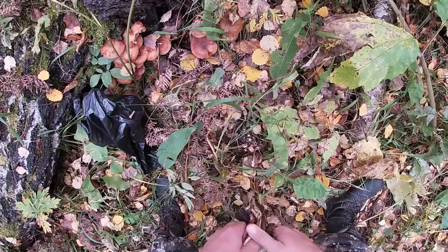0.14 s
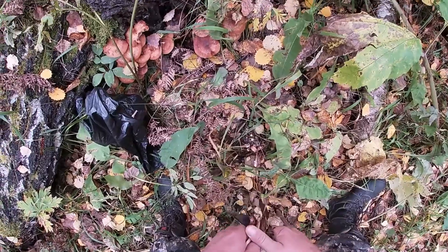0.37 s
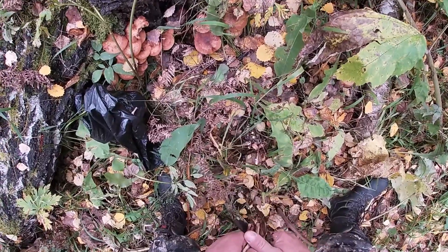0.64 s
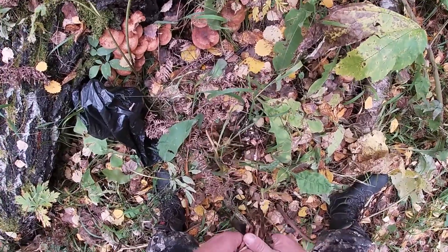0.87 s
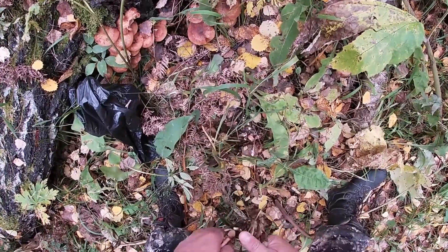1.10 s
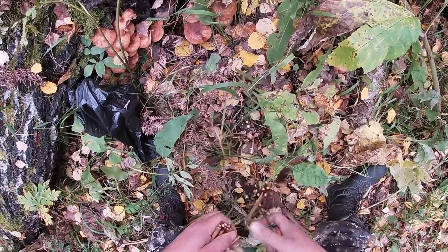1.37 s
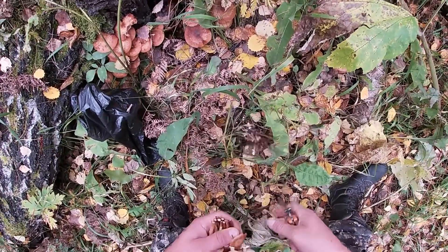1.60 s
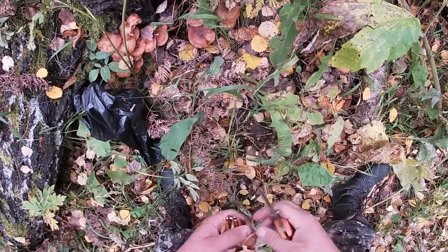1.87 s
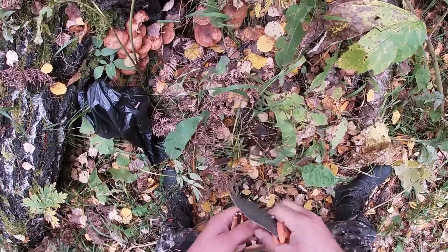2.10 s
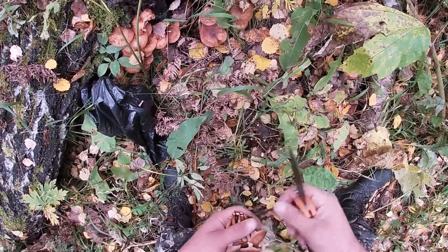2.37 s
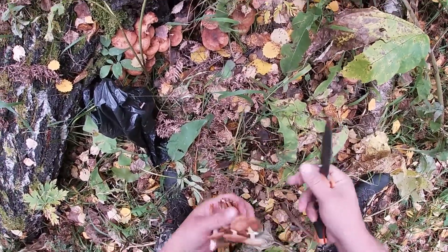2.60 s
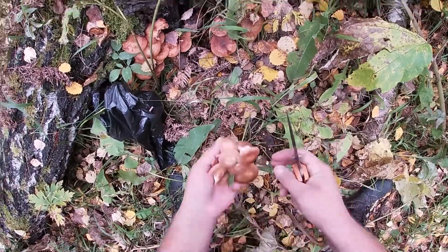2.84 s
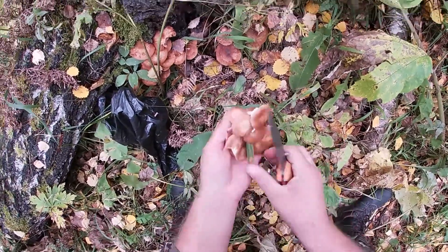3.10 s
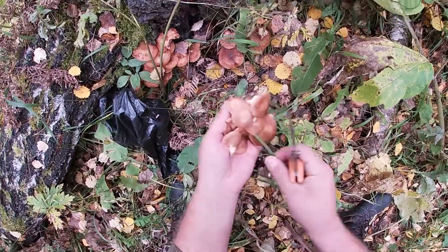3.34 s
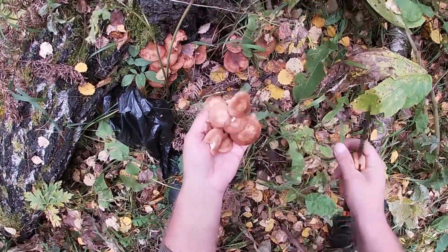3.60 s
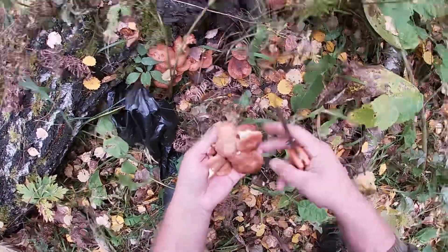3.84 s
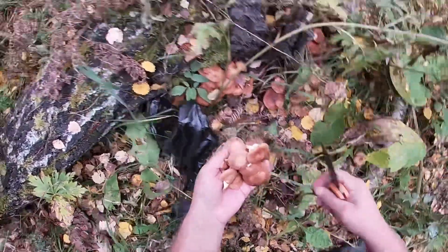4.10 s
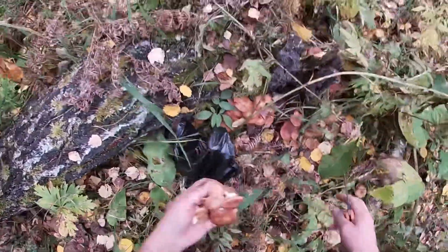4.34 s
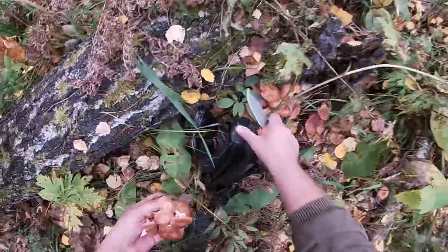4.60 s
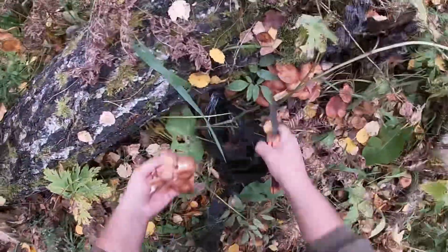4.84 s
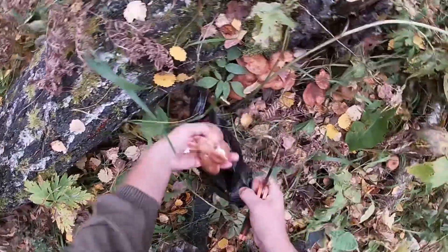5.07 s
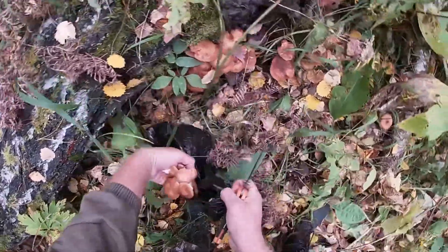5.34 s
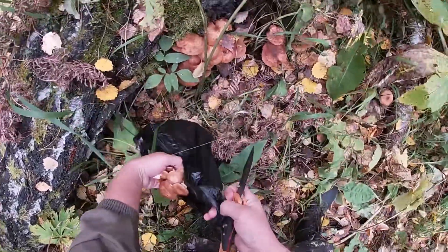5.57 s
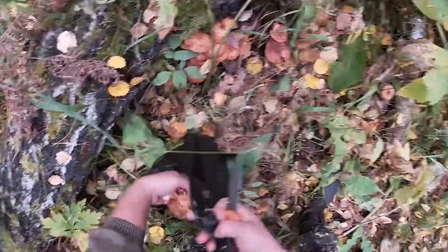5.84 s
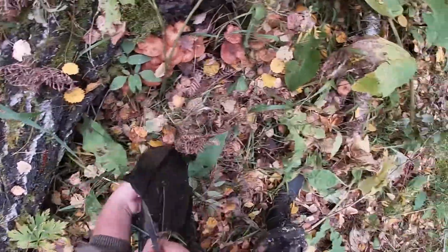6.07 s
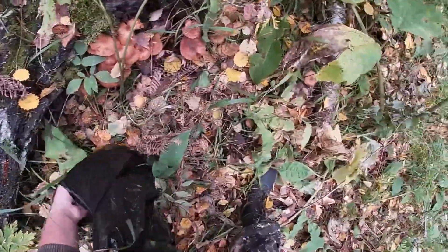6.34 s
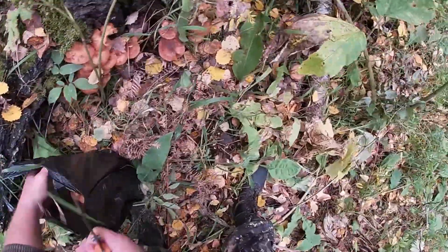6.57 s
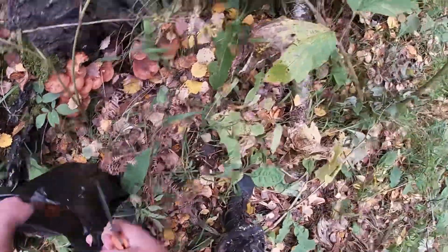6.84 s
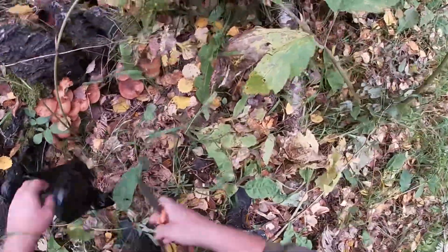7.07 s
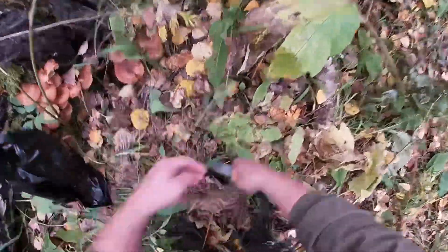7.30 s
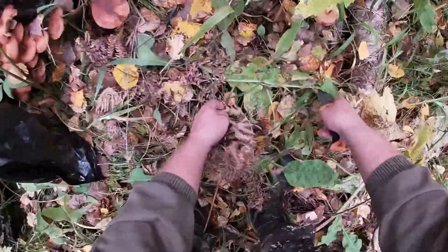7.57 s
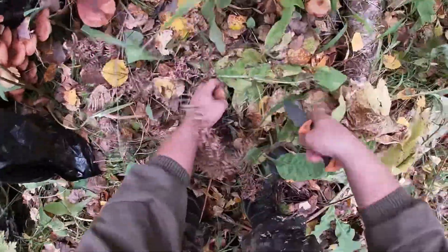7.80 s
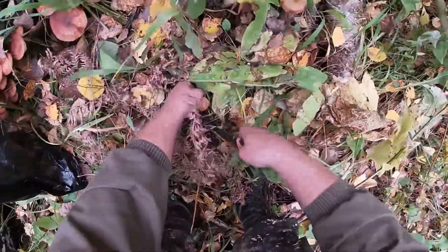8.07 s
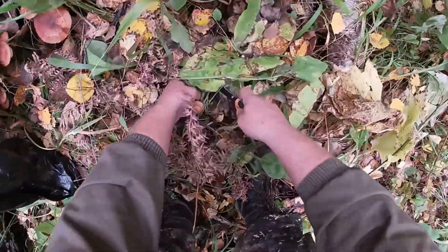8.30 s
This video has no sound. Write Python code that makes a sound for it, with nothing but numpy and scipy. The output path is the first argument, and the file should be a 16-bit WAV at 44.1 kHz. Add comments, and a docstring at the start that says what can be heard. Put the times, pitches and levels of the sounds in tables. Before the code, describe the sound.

Dry leaves fizz and rub in short strokes, then stems and a plastic bag crumple, sharp twig cracks peaking before it thins out.

```python
"""Forest floor, hands and a knife at work in dry leaves, heard close by the microphone of a body-worn camera.
First leaves fizz in single strokes as sleeves rub and a few twigs crack; from 3 s snaps and knocks come closer.
At 4.8 s a stem squeaks on the blade, then stems and a thin plastic bag crumple about as loud as the leaves.
The hardest snaps fall from 6.5 to 7.8 s among thumps; then it thins out, with last cracks at 8.4 s.
Shaped noise makes hiss, rustle and camera shake; damped sines and rung noise bursts make knocks and snaps."""
import sys
import numpy as np
from scipy import signal
from scipy.fft import rfft, irfft, next_fast_len
from scipy.io import wavfile
from scipy.ndimage import uniform_filter1d

SR = 44100
rng = np.random.default_rng(int(sys.argv[2]) if len(sys.argv) > 2 else 0)


def level_to_linear(level):
    """Convert decibel levels to linear amplitude factors, elementwise."""
    exponent = np.asarray(level, float) / 20
    return 10 ** exponent


def transcribe(signal):
    """Save signal, clipped to [-1, 1], as a 16-bit WAV file at the path in sys.argv[1]."""
    frames = np.atleast_2d(signal).T
    limited = np.clip(frames, -1, 1)
    pcm = np.round(limited * 32767).astype(np.int16)
    wavfile.write(sys.argv[1], SR, pcm)


N = 371983


def unit(x):
    """Scales x to rms 1."""
    return x / np.sqrt(np.mean(x ** 2) + 1e-20)


def curves(rows):
    """Interpolates each column after the time to one value per sample."""
    s, *cols = np.transpose(rows)
    return [np.interp(np.arange(N) / SR, s, c) for c in cols]


def coloured(x, points):
    """Passes x through the causal minimum-phase filter whose gain follows the (f/Hz, level/dB) points."""
    size = 2 * next_fast_len(len(x) // 2 + 4096)
    hz, db = np.transpose(points)
    log_f = np.log(np.fft.rfftfreq(size, 1 / SR) + 1)
    gain = level_to_linear(np.interp(log_f, np.log(hz + 1), db))
    # folding the cepstrum onto positive times makes the filter causal
    cepstrum = irfft(np.log(np.maximum(gain, 1e-6)), size)
    cepstrum[1:size // 2] *= 2
    cepstrum[size // 2 + 1:] = 0
    return irfft(rfft(x, size) * np.exp(rfft(cepstrum)), size)[:len(x)]


def swells(s, db, rise_s, fade_s):
    """Sums the power of events that swell to a peak and fade at steady dB per second, and returns the gain."""
    rounding = 0.15  # of the top of a swell, in its own 10 dB times
    t = np.arange(0, N + 64, 64) / SR
    late = t[:, None] - s
    span_s = np.where(late < 0, np.maximum(rise_s, .002), np.maximum(fade_s, .01))
    away = np.abs(late) / span_s
    level_db = db - 10 * (np.hypot(away, rounding) - rounding)
    power = np.sum(level_to_linear(2 * level_db), axis=1)
    return np.interp(np.arange(N) / SR, t, np.sqrt(power))


# spectrum of the steady hiss, relative: f/Hz, level/dB
FOREST_SPECTRUM = [(29, -27), (50, -14), (91, -29), (182, -2), (476, -9), (733, -5.5), (1620, -6),
                   (3240, -0.5), (4430, -7.5), (7870, 0), (8660, 0), (11000, -16.5), (15400, -23)]


def forest_hiss():
    """Steady noise of the forest and the microphone."""
    return level_to_linear(-52.5) * unit(coloured(rng.standard_normal(N), FOREST_SPECTRUM))


# slow pushes on the camera: t/s of the peak, level/dB (rms), time/s for 10 dB of swell and of fade
CAMERA_JOLTS = [(0, -53, .13), (.52, -60, .14), (.82, -58, .06), (1.09, -51, .05), (1.36, -57, .1),
                (1.71, -59, .1), (2.8, -62, .4), (3.28, -53, .12), (3.47, -57, .1), (3.85, -62, .2),
                (4.3, -45, .12), (4.55, -52, .12), (4.84, -44, .11), (5.2, -62, .15), (5.56, -56, .07),
                (5.93, -49, .1), (6.2, -57, .1), (6.48, -55, .1), (6.9, -49, .045), (7.28, -46, .08),
                (7.49, -42, .07), (7.91, -56, .12), (8.24, -59, .1)]
# spectrum of the shaking camera, relative: f/Hz, level/dB
SHAKE_SPECTRUM = [(4.7, -33), (8.0, 3), (27, 5.5), (36, -10), (60, -18), (78, -47), (130, -120)]


def camera_shake():
    """Sub-bass noise from the camera moving: it swells with each push and never quite rests."""
    sway_db = -73.5
    s, db, span_s = np.transpose(CAMERA_JOLTS)
    gain = level_to_linear(sway_db) + swells(s, db, span_s, span_s)
    return gain * unit(coloured(rng.standard_normal(N), SHAKE_SPECTRUM))


# single swings of the camera: t/s of the peak, level/dB (peak), f/Hz
CAMERA_LURCHES = [(1.072, -35, 28), (4.698, -28, 22)]


def camera_lurches():
    """Each swing is a very low cosine under a bell-shaped envelope about a cycle wide."""
    out = np.zeros(N)
    for s, db, hz in CAMERA_LURCHES:
        cycles = (np.arange(N) / SR - s) * hz
        out += level_to_linear(db) * np.exp(-(cycles / 0.59) ** 2) * np.cos(2 * np.pi * cycles)
    return out


def soft_knocks(events):
    """Soft contact: a few cycles of a damped sine with a rounded start, peaking about 8 dB under its gain."""
    out, t = np.zeros(N + SR), np.arange(SR // 10) / SR
    for s, db, hz in events:
        decay = np.exp(-t * hz / 1.38)
        onset = 1 - np.exp(-t * hz / 0.6)
        out[round(s * SR):][:len(t)] += level_to_linear(db) * decay * onset * np.sin(2 * np.pi * hz * t)
    return out[:N]


# deep thuds of the ground: t/s, level/dB (gain of the knock)
GROUND_THUDS = [(3.121, -42), (3.149, -46), (3.242, -53), (4.116, -58), (5.864, -56), (6.659, -36),
                (7.306, -43), (7.579, -52), (7.637, -37)]


def ground_thuds():
    """Knocks of the ground, each pitched at random around 78 Hz."""
    return soft_knocks([(s, db, 78 * rng.uniform(0.88, 1.2)) for s, db in GROUND_THUDS])


# dull knocks of hands, feet and the load in the bag: t/s, level/dB (gain of the knock), f/Hz
DULL_KNOCKS = [(0.016, -34, 226), (1.012, -35, 258), (1.302, -43, 260), (1.742, -40, 242),
               (2.129, -30, 703), (3.121, -28, 670), (3.149, -29, 172), (3.242, -38, 170),
               (4.116, -41, 339), (4.23, -35, 235), (4.281, -35, 197), (4.484, -37, 199), (4.554, -24, 610),
               (4.601, -20, 794), (4.613, -22, 800), (4.95, -39, 166), (5.832, -32, 272), (5.864, -28, 168),
               (6.051, -28, 516), (6.659, -31, 662), (6.718, -24, 188), (6.929, -30.5, 191),
               (7.199, -32, 221), (7.306, -28.5, 427), (7.51, -21, 780), (7.579, -29.5, 136),
               (7.637, -28, 205), (7.701, -32, 221)]


def thumps():
    """Knocks of hands, feet and load, each at its own pitch."""
    return soft_knocks(DULL_KNOCKS)


# a stem slips on the blade: t/s, f/Hz, level/dB (rms)
STEM_SQUEAK = [(4.795, 1900, -45), (4.822, 1810, -46), (4.84, 2100, -42), (4.855, 2070, -52)]


def squeak():
    """A short whistle of a sine that dips, then rises in pitch."""
    hz, db = curves(STEM_SQUEAK)
    t = np.arange(N) / SR
    to_edge_s = np.minimum(t - STEM_SQUEAK[0][0], STEM_SQUEAK[-1][0] - t)
    fade = np.clip(to_edge_s / .006, 0, 1)
    return np.sqrt(2) * fade * level_to_linear(db) * np.sin(2 * np.pi * np.cumsum(hz) / SR)


# twigs and creases that give way: t/s, level/dB (peak), f/Hz of the main ring,
# level/dB of the dull part, level/dB of the woody part (both early rms against the main ring's peak)
TWIG_SNAPS = [(0.092, -25, 2600, -22, -18), (0.325, -30, 2200, -20, -18), (0.986, -30, 3400, -19, -16),
              (1.013, -26, 4390, -28, -22), (1.017, -18, 7100, -32, -28), (1.0195, -18, 5200, -27, -26),
              (1.024, -23, 7630, -28, -22), (1.751, -23, 8060, -34, -24), (1.79, -22, 5630, -36, -24),
              (2.587, -23, 8300, -42, -36), (2.973, -18, 8560, -44, -38), (3.12, -17, 7030, -28, -20),
              (3.1225, -21, 5730, -28, -20), (3.128, -22, 6730, -26, -16), (3.387, -27, 4160, -36, -18),
              (3.405, -23, 3830, -40, -30), (3.476, -28, 5000, -36, -20), (4.207, -21, 6440, -38, -28),
              (4.363, -24, 7140, -36, -30), (4.4355, -21, 6790, -38, -28), (4.601, -21, 5000, -24, -20),
              (4.6415, -18, 4640, -19, -24), (6.541, -12, 8600, -44, -40), (6.7215, -16, 2200, -17, -13),
              (6.752, -21, 2900, -24, -15), (6.849, -16, 8320, -15, -14), (6.884, -20, 1520, -15, -20),
              (6.8935, -14.5, 1500, -15, -15), (6.9345, -15.5, 2000, -16, -13),
              (6.965, -24, 2950, -22, -14), (7.08, -17, 5000, -32, -26), (7.145, -13, 8340, -17, -13),
              (7.523, -14, 2900, -26, -15), (7.66, -15, 6310, -30, -22), (7.744, -18, 3080, -32, -15),
              (8.37, -30, 2040, -16, -10), (8.399, -15, 8220, -28, -18), (8.4015, -16, 7220, -30, -19)]
# microphone colour on the snaps, a bass cut and a slight treble peak: f/Hz, level/dB
MICROPHONE = [(60, -40), (300, -10), (700, -2), (3500, -2), (8000, 0), (10500, -12), (15900, -26)]


def ring(x, hz):
    """A broad resonance: x rings at hz and dies within about a cycle."""
    t = np.arange(len(x)) / SR
    response = np.exp(-2.2 * hz * t) * np.cos(2 * np.pi * hz * t)
    return signal.fftconvolve(x, response)[:len(x)]


def snaps():
    """A sharp break and a few ms of splintering, through the broad resonances of the piece that breaks."""
    out, t = np.zeros(N + SR), np.arange(SR // 20) / SR
    early = lambda x: x / np.std(x[:SR // 800])  # level set over the first 1.25 ms
    for s, db, hz, dull_db, woody_db in TWIG_SNAPS:
        splinter = rng.standard_normal(len(t)) * level_to_linear(-60 * t / .013)  # 60 dB down in 13 ms
        splinter[0] = -2.0  # the break itself
        dull_hz, woody_hz = np.array([1350, 2800]) * rng.uniform(.85, 1.15, 2)
        main = ring(splinter, hz)
        dull = ring(ring(splinter, dull_hz), dull_hz)
        woody = ring(ring(splinter, woody_hz), woody_hz)
        crack = main / np.abs(main).max()
        crack = crack + level_to_linear(dull_db) * early(dull) + level_to_linear(woody_db) * early(woody)
        crack = coloured(crack, MICROPHONE)
        out[round(s * SR):][:len(t)] += level_to_linear(db) * crack / np.abs(crack).max()
    return out[:N]


def creases(rate, spread_db, t60):
    """Power, of mean 1, of random creases: each starts at once and dies 60 dB in t60 s; some are larger."""
    size = np.minimum(rng.exponential(size=N), 2.5)
    start = (rng.random(N) < rate / SR) * level_to_linear(2 * spread_db * size)
    power = signal.lfilter([1], [1, -level_to_linear(-120 / (t60 * SR))], start)
    return power / power.mean()


def patches(depth_db):
    """White noise whose gain wanders in patches of time and pitch."""
    z = signal.stft(rng.standard_normal(N), nperseg=256)[2]
    field = uniform_filter1d(rng.standard_normal(z.shape), size=5, axis=0)
    field = uniform_filter1d(field, size=8, axis=1)
    return signal.istft(z * level_to_linear(depth_db * unit(field)), nperseg=256)[1][:N]


# moves of the hands through leaves and bag: t/s of the peak, level/dB of the leaf fizz (rms),
# time/s for the last 10 dB of swell, time/s for the first 10 dB of fade (both before the stretch below),
# level/dB of the crumple over the fizz
HAND_STROKES = [(0.054, -39.0, 0.077, 0.122, -4.0), (0.275, -44.0, 0.052, 0.068, -3.5),
                (0.44, -47.5, 0.214, 0.047, -1.5), (0.527, -44.5, 0.075, 0.181, -4.5),
                (0.661, -36.5, 0.061, 0.045, -7.0), (0.761, -37.0, 0.165, 0.152, -7.5),
                (0.945, -40.0, 0.031, 0.115, -8.5), (1.019, -41.5, 0.044, 0.03, -4.0),
                (1.175, -54.5, 0.078, 0.03, 0.5), (1.263, -57.5, 0.032, 0.094, -0.5),
                (1.43, -51.0, 0.185, 0.03, -4.0), (1.605, -45.0, 0.049, 0.086, -9.0),
                (1.813, -45.0, 0.099, 0.053, -5.5), (1.979, -40.5, 0.157, 0.098, -5.0),
                (2.122, -50.0, 0.089, 0.107, 0.5), (2.239, -47.0, 0.031, 0.092, -5.0),
                (2.355, -46.0, 0.078, 0.057, -7.0), (2.54, -44.0, 0.043, 0.32, -3.5),
                (2.663, -39.5, 0.153, 0.066, -11.0), (2.765, -42.5, 0.144, 0.049, -5.5),
                (2.975, -34.0, 0.056, 0.113, -7.0), (3.131, -37.0, 0.04, 0.062, -4.5),
                (3.279, -41.5, 0.075, 0.069, -6.5), (3.475, -44.0, 0.255, 0.134, -4.0),
                (3.663, -47.0, 0.051, 0.098, -5.0), (3.908, -30.0, 0.048, 0.077, -6.5),
                (4.124, -47.5, 0.137, 0.034, -5.0), (4.219, -53.5, 0.07, 0.384, 2.0),
                (4.372, -39.0, 0.068, 0.186, -1.0), (4.518, -45.0, 0.03, 0.115, 2.5),
                (4.63, -40.5, 0.069, 0.045, 2.5), (4.79, -42.5, 0.057, 0.11, -0.5),
                (4.901, -46.5, 0.098, 0.054, 1.0), (5.051, -40.5, 0.12, 0.03, 3.0),
                (5.175, -33.5, 0.108, 0.214, 0.5), (5.371, -35.0, 0.059, 0.198, -3.0),
                (5.605, -35.5, 0.078, 0.131, 2.0), (5.865, -36.0, 0.118, 0.167, 2.0),
                (6.009, -34.5, 0.067, 0.144, 2.0), (6.224, -37.0, 0.072, 0.124, 0.5),
                (6.365, -37.5, 0.05, 0.179, 0.0), (6.487, -35.0, 0.056, 0.4, -3.0),
                (6.615, -36.0, 0.16, 0.1, 1.0), (6.737, -46.0, 0.161, 0.039, 8.0),
                (6.907, -36.5, 0.16, 0.098, -2.0), (7.072, -33.0, 0.059, 0.201, -3.5),
                (7.274, -31.5, 0.295, 0.068, -1.0), (7.545, -27.0, 0.083, 0.113, -3.0),
                (7.65, -27.0, 0.104, 0.03, -8.0), (7.74, -35.0, 0.277, 0.139, -0.5),
                (7.876, -42.5, 0.03, 0.039, -10.0), (8.04, -48.0, 0.236, 0.259, -2.5),
                (8.273, -52.5, 0.13, 0.092, 6.5), (8.355, -47.0, 0.03, 0.094, 0.5),
                (8.402, -35.5, 0.004, 0.4, -3.5)]
# stretch of those times for fizz, crumple and rub [factor]
STROKE_STRETCH = (1.0, 1.1, 1.15)
# sleeve rub against the crumple: t/s, level/dB
RUB_SHARE = [(0.0, -5), (0.35, -2.0), (0.7, -5.5), (1.1, -1.5), (1.55, -3.5), (1.75, -1), (2.2, -2.5),
             (2.45, -6.0), (2.8, -4), (3.0, -9), (3.5, -6.5), (3.9, -9.5), (4.1, -12.5), (4.3, -6.5),
             (4.58, -5), (4.66, 0.5), (4.85, -10.5), (5.6, -8.0), (6.2, -9.5), (6.7, -6.5), (7.3, -8),
             (7.9, -9.5), (8.43, -8)]
# spectra of the three materials, relative: f/Hz, level/dB
LEAF_SPECTRUM = [(2470, -33.5), (4200, -11), (8120, 2), (9970, -9.5), (11100, -18.5), (14700, -21),
                 (15800, -31)]
CRUMPLE_SPECTRUM = [(650, -43.5), (1100, -8.5), (1720, -2), (3070, 3), (4600, 1), (5200, 2), (6760, -1.5),
                    (11400, -120)]
SLEEVE_SPECTRUM = [(29, -19), (50, -7), (65, -11.5), (108, -20.5), (144, 2.5), (185, 4), (453, -0.5),
                   (650, 2.5), (1400, -0.5), (1820, -4.5), (3080, -120)]


def rustle():
    """Leaves, stems with bag, and sleeves under the same hands: noise with tiny ticks and clumps of creases."""
    fine = creases(rate=300, spread_db=3, t60=.004)
    large = creases(rate=120, spread_db=2, t60=.035)  # the same clumps sound in all three
    s, fizz_db, rise_s, fade_s, over_db = np.transpose(HAND_STROKES)
    crumple_db = fizz_db + over_db
    fizz, crumple, rub = [swells(s, db, k * rise_s, k * fade_s)
                          for db, k in zip((fizz_db, crumple_db, crumple_db), STROKE_STRETCH)]
    rub = rub * level_to_linear(curves(RUB_SHARE)[0])

    def material(level, spectrum, grain, clump=.2):
        """Noise whose power is part smooth, part fine ticks (grain), part large creases (clump)."""
        power = 1 - grain - clump + grain * fine + clump * large
        return level * unit(coloured(np.sqrt(power) * patches(depth_db=1.0), spectrum))

    leaves = material(fizz, LEAF_SPECTRUM, grain=.14)
    stems_and_bag = material(crumple, CRUMPLE_SPECTRUM, grain=.12)
    sleeves = material(rub, SLEEVE_SPECTRUM, grain=.1)
    return leaves + stems_and_bag + sleeves


def scene():
    """One microphone feeds both channels."""
    background = forest_hiss() + camera_shake() + camera_lurches()
    contacts = ground_thuds() + thumps() + squeak() + snaps()
    return np.tile(background + contacts + rustle(), (2, 1))


def roll_off(x):
    """The treble ends steeply here."""
    return signal.sosfilt(signal.butter(12, 15950, fs=SR, output="sos"), x)


def record(dry):
    """The highest treble keeps its level but differs in phase between left and right."""
    hz, _, z = signal.stft(dry, SR, nperseg=256)
    highest = (hz > 12160)[:, None]
    turn = 1.4 * rng.standard_normal(z.shape) * highest  # radians
    lift = level_to_linear(2.4 * highest)  # makes up for what the scattered phases cancel
    mix = signal.istft(z * lift * np.exp(1j * turn), SR, nperseg=256)[1][:, :N]
    return roll_off(mix)


dry = scene()
out = record(dry)
transcribe(out)
```